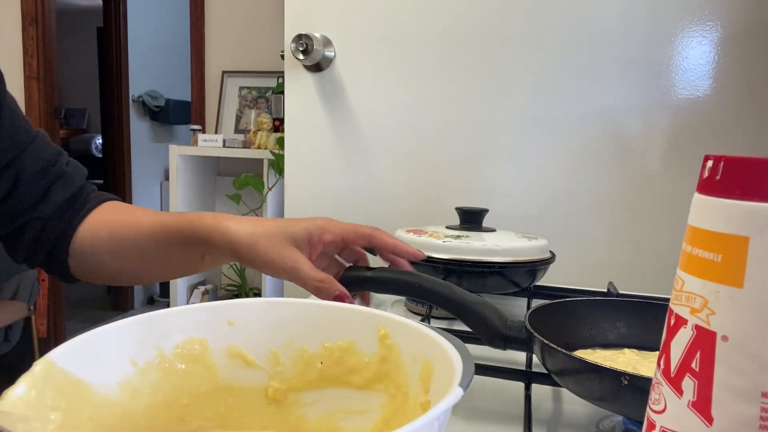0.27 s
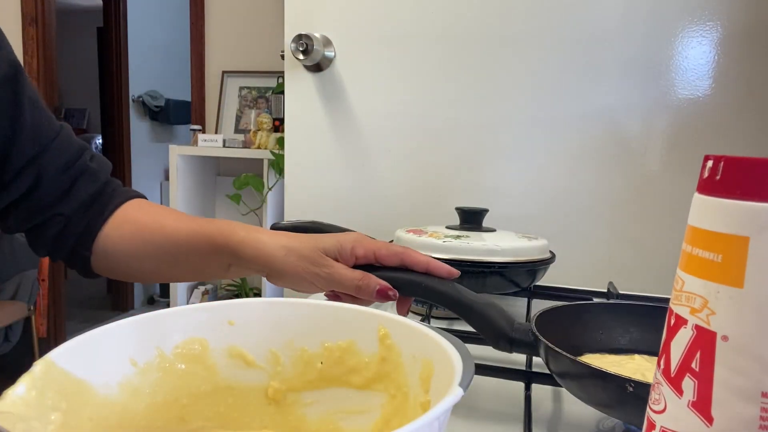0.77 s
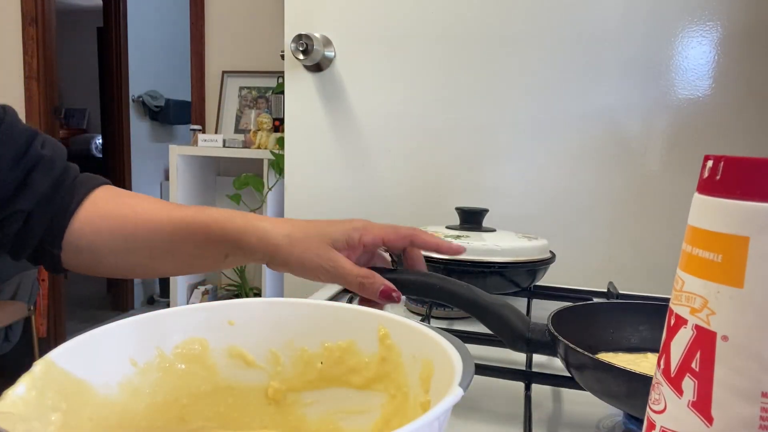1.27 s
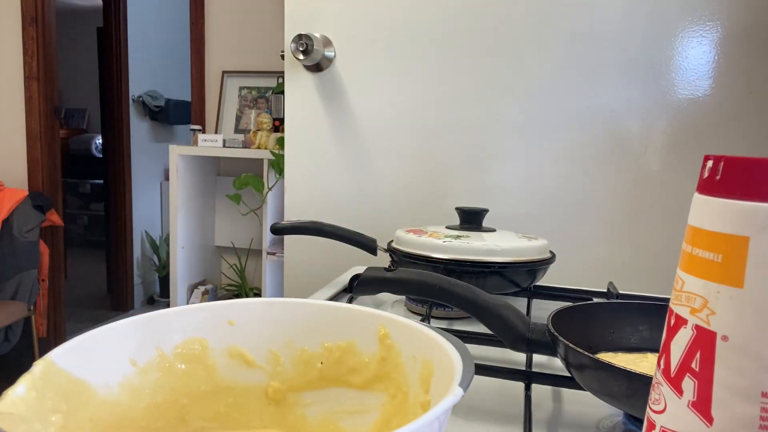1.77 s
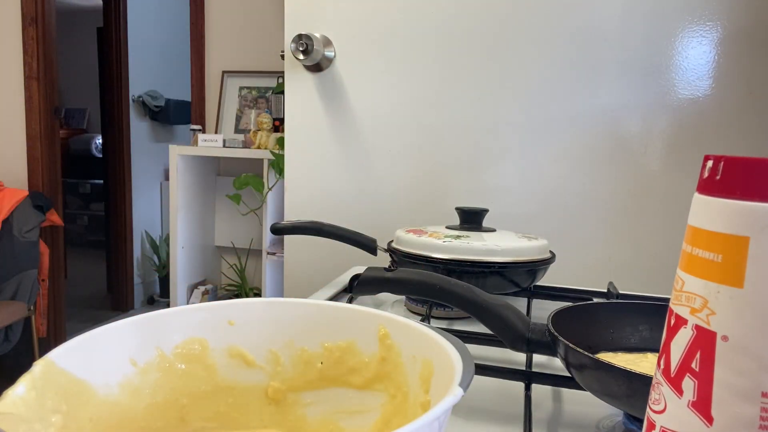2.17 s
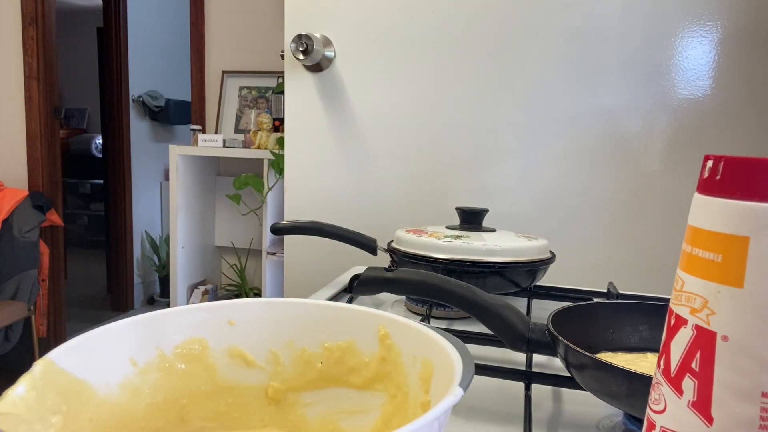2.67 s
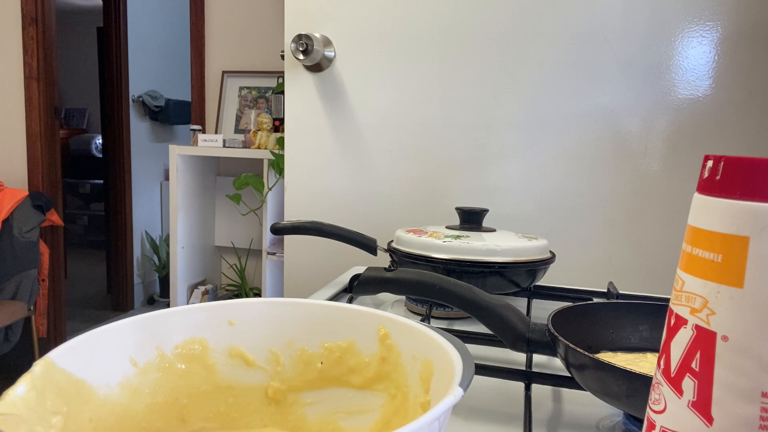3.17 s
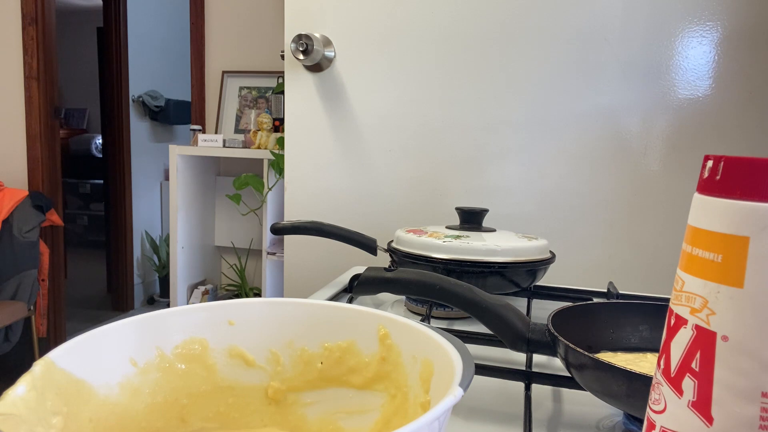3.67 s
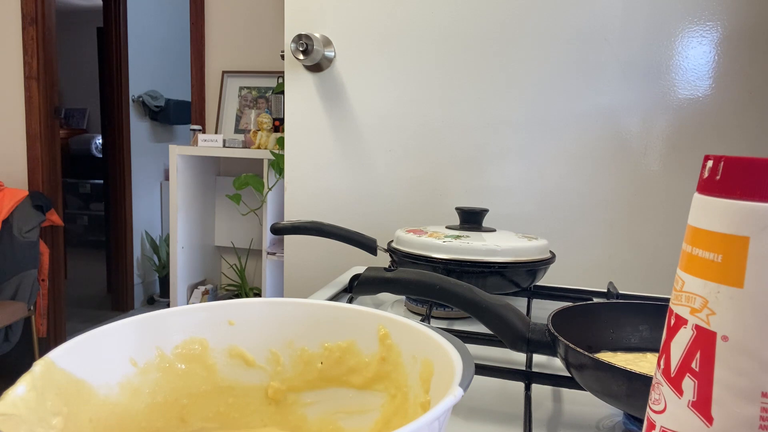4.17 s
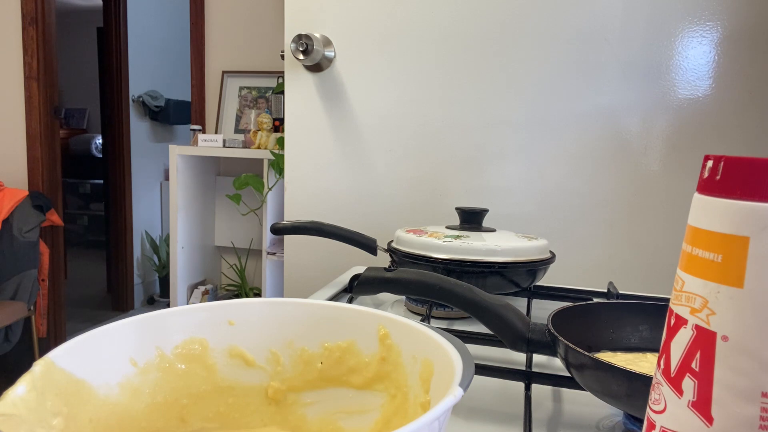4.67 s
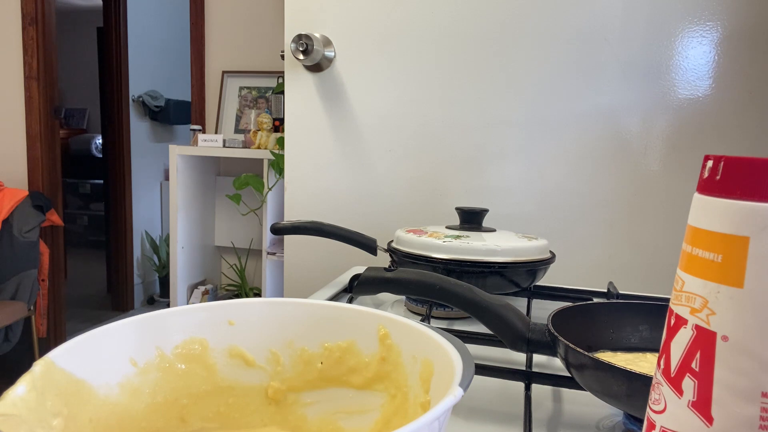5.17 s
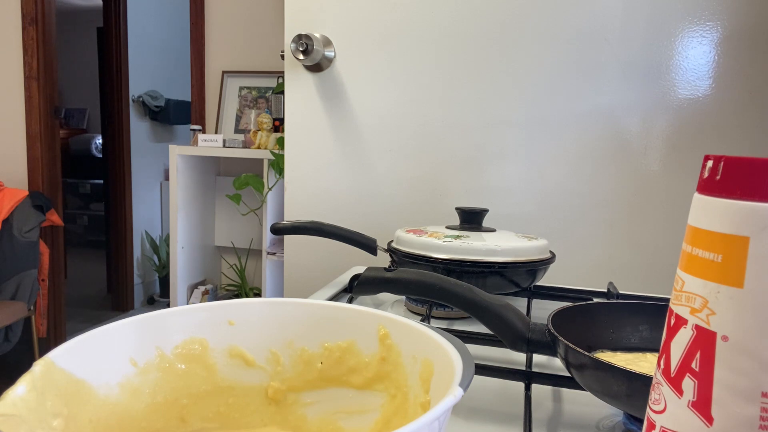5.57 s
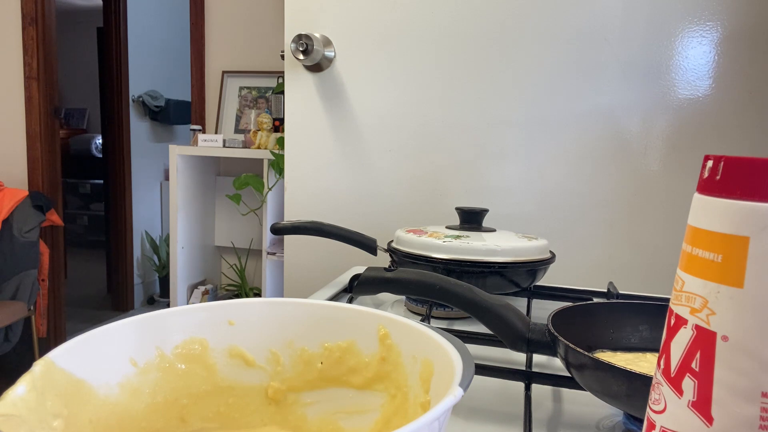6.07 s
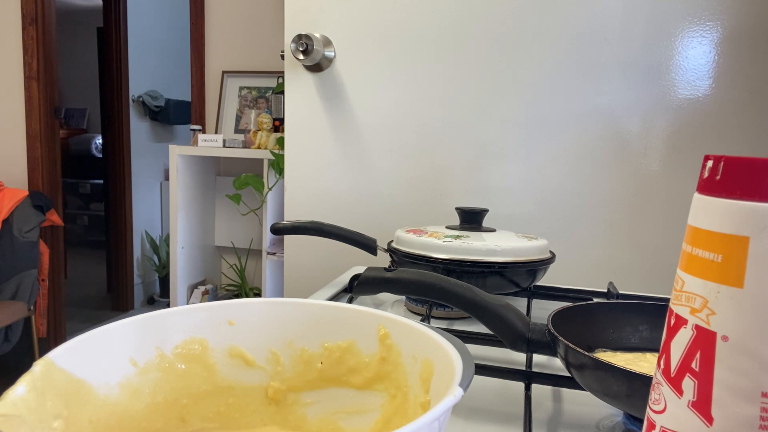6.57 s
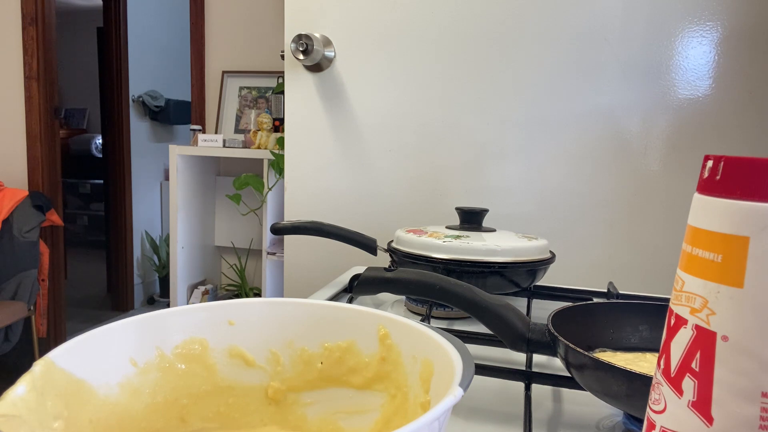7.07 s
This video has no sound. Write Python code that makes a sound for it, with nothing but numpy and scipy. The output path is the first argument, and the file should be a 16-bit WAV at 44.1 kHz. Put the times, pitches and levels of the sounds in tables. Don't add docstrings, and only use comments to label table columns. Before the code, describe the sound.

A small kitchen heard in stereo close to a frying pan, lasting about 7.3 seconds. A quiet, fine batter sizzle continues throughout, slightly brighter with time, over low rumble and fridge hum. A departing vehicle's hum sinks and fades by 0.6 s. A sharp fat spit snaps at 0.4 s, followed by dull cookware bumps and knocks from 0.6 to 1 s. Smaller spits pop at 1.5 and 2.1 s. Light bumps come at 3.2 and 3.5 s, a lid taps at 3.6 s, and a pot lands at 3.75 s with the loudest clunk, bouncing briefly with short dull rings. Thin metal clinks sound at 4.9 and around 6 s. Pops return at 5.3 and 5.6 s, a strong one at 6.44 s, then a soft bump and more near 7 s. Tiny bubble whistles flicker occasionally. An outside engine drones, working harder from 5 s.

```python
import sys
import numpy as np
from scipy import signal
from scipy.fft import rfft, irfft, next_fast_len
from scipy.io import wavfile
from scipy.ndimage import uniform_filter1d

SR = 44100
rng = np.random.default_rng(int(sys.argv[2]) if len(sys.argv) > 2 else 0)


def how_loud(loudness_db):
    steps = np.asarray(loudness_db, float) / 20
    return 10 ** steps


def generate_wav(sig):
    pcm = np.round(np.clip(np.atleast_2d(sig).T, -1, 1) * 32767).astype(np.int16)
    wavfile.write(sys.argv[1], SR, pcm)


N = 323246


def evened(x):
    return x / np.sqrt(np.mean(x ** 2) + 1e-20)


def read(points, hz):
    f, value = np.transpose(points)
    return np.interp(np.log(hz + 1), np.log(f + 1), value)


def curves(rows, t):
    s, *columns = np.transpose(rows)
    return [np.interp(t, s, c) for c in columns]


def add(mix, s, sound):
    part = mix[..., round(s * SR):][..., :sound.shape[-1]]
    part += sound[..., :part.shape[-1]]


def highpass(x, order, hz):
    return signal.sosfilt(signal.butter(order, hz, "high", fs=SR, output="sos"), x)


def wander(rate_hz, size):
    smooth = [1, -np.exp(-2 * np.pi * rate_hz / SR)]
    once = signal.lfilter([1], smooth, rng.standard_normal(size))
    return evened(signal.lfilter([1], smooth, once))


def tinted(x, shape_db):
    return irfft(rfft(x) * how_loud(shape_db(np.fft.rfftfreq(len(x), 1 / SR))), len(x))


def noise(field_db, size):
    frames, hz = 4 * N // size + 5, np.fft.rfftfreq(size, 1 / SR)
    a, b = rng.standard_normal((frames, len(hz), 2, 2)).T
    shape = how_loud(field_db(hz[:, None], np.arange(frames) * size / 4 / SR))
    return signal.istft((a + 1j * b) * shape, nperseg=size, noverlap=3 * size // 4)[1][:, :N]


def patches(hz, t, wide, long):
    blots = rng.standard_normal((len(t), len(hz))).T
    return evened(uniform_filter1d(uniform_filter1d(blots, wide, 0), long, 1))


def tone(turn_hz, db):
    t = np.arange(len(turn_hz)) / SR
    turn = 2 * np.pi * np.cumsum(turn_hz) / SR + 0.45 * wander(2.4, size=len(t))
    fade = np.minimum(1, np.minimum(t + 0.0073, t[-1] - t + 0.0053) / 0.014)
    return np.sqrt(2) * how_loud(db + 2.14 * wander(2.0, size=len(t))) * np.sin(turn) * fade


def ring(modes, pitch=1, contact=.001, count=8192):
    t = np.arange(count) / SR
    force = rng.standard_normal(count) * np.exp(-t / contact)
    force /= np.linalg.norm(force)
    share = np.maximum(uniform_filter1d(abs(rfft(force)), size=5), .4)
    sines = np.zeros(count)
    for hz, db, t60 in modes:
        mode_hz = hz * pitch
        sines += how_loud(db - 60 * t / t60) * np.sin(2 * np.pi * mode_hz * t) / share[int(mode_hz * count / SR)]
    return signal.fftconvolve(sines, force)[:count]


# (frequency [Hz], level [dB])
HISS_COLOUR = [(300, -9), (830, -14), (1100, -8.5), (1500, -13), (2000, -15.5), (2600, -12.5), (4000, -16),
               (5500, -17.5), (6800, -16), (8500, -18.5), (11000, -20), (14000, -23), (16000, -31),
               (16500, -40)]
# (time [s], level [dB])
FRYING = [
    (0.0, -58),
    (0.53, -58),
    (1.73, -58.5),
    (2.06, -57),
    (2.86, -58),
    (3.88, -56),
    (4.04, -57),
    (4.22, -58.5),
    (7.33, -57),
]
# (frequency [Hz], width [Hz], lift [dB])
PAN_RINGS = [(1004, 31, 3.5), (1500, 27.5, 5.5), (1798, 21, 5.5), (2212, 53, 4.5), (2463, 68, 5),
             (2930, 81, 2.5), (3330, 68, 3.5)]


def hiss():
    def field(hz, t):
        level_db = curves(FRYING, t)[0] - 22.72
        tilt_db = -0.55 + 0.11 * t
        rings = sum(db / (1 + ((hz - f) / width) ** 2) for f, width, db in PAN_RINGS)
        flicker = 0.94 * evened(uniform_filter1d(rng.standard_normal(len(t)), 6))
        blots = 2.47 * patches(hz, t, wide=5, long=16)
        tilted = tilt_db * np.log2((hz + 50) / 4000)
        return read(HISS_COLOUR, hz) + level_db + tilted + rings + blots + flicker
    steam = noise(field, size=512)
    ticks_per_s, tick_t60_s = 60, 0.0032
    ticks = how_loud(3.9 * np.minimum(rng.exponential(1, N), 3)) * (rng.random(N) < ticks_per_s / SR)
    crackle = signal.oaconvolve(ticks, how_loud(-60 * np.arange(400) / SR / tick_t60_s))[:N]
    return how_loud(20) * steam * (1 + 0.2 * crackle)


def load(t):
    from_s, full_s = 4.9, 6.9
    return np.clip((t - from_s) / (full_s - from_s), 0, 1)


# (frequency [Hz], level [dB])
RUMBLE_COLOUR = [(20, -26), (40, -56), (70, 4), (110, -1.5), (150, -8), (220, -13.5), (320, -13),
                 (480, -26.5), (900, -68)]


def rumble():
    t = np.arange(N) / SR
    low = noise(lambda hz, t: read(RUMBLE_COLOUR, hz) + 2.7 * patches(hz, t, wide=3, long=8), size=2048)
    return evened(low) * how_loud(-50.5 + 5 * load(t))


# (time [s], frequency [Hz], level [dB])
DEPARTING = [
    (0, 72, -36),
    (.18, 69.9, -37),
    (.3, 65.7, -47),
    (0.451, 61.6, -45),
    (.62, 57.3, -58),
]


def departing_vehicle():
    s = np.arange(DEPARTING[0][0], DEPARTING[-1][0], 1 / SR)
    out = np.zeros(N)
    add(out, s[0], tone(*curves(DEPARTING, s)))
    return out


# (start [s], end [s], start pitch [Hz], end pitch [Hz], level [dB])
DRONES = [
    (0, 0.56, 130, 133, -49.5),
    (0.7, 7.33, 93.4, 93.6, -49.5),
    (1.1, 4.9, 62, 80, -53),
    (4.5, 7.33, 76, 72, -48),
    (4.5, 6.15, 178.5, 175, -53.5),
    (6.3, 7.33, 173, 173.5, -53),
    (1, 2.7, 141, 141.2, -66),
    (1.6, 3.4, 140, 166, -65),
    (4.55, 5.35, 170, 130, -66),
    (6.55, 7.33, 190, 120, -56.5),
]


def drones():
    out = np.zeros(N)
    for start, end, from_hz, to_hz, db in DRONES:
        share = np.linspace(0, 1, round((end - start) * SR))
        swell_db = -4 * np.maximum(1 - share / 0.75, 0) * (start > .1)
        add(out, start, tone(from_hz + (to_hz - from_hz) * share, db + swell_db))
    return out


# (time [s], firing rate [Hz], level [dB])
ENGINE = [(0.66, 109.9, -47), (0.92, 112.4, -51), (1.13, 111.9, -51.5), (1.37, 111.5, -47),
          (2.94, 110.9, -48), (3.21, 108.5, -47), (3.73, 105.7, -40.5), (3.77, 106.1, -34),
          (4.0, 106.1, -42.5), (4.82, 102.3, -36.5), (5.86, 105.3, -41), (6.36, 108.5, -40.5),
          (7.22, 106.7, -42), (7.33, 110.7, -49)]
# (multiple of the firing rate, idle level [dB], gain under load [dB])
ENGINE_ORDERS = [(.42, -60.5, 0), (2, -72, 12.5), (3, -74.5, 10.5), (4, -79.5, 13)]


def engine():
    t = np.arange(ENGINE[0][0], ENGINE[-1][0], 1 / SR)
    firing_hz, level_db = curves(ENGINE, t)
    out = np.zeros(N)
    add(out, t[0], tone(firing_hz, level_db))
    for multiple, db, load_db in ENGINE_ORDERS:
        add(out, t[0], tone(multiple * firing_hz, db + load_db * load(t)))
    return out


# (time [s], level [dB], body frequency [Hz],
# contact [s])
BUMPS = [(.56, -43.5, 1020, 0.056), (.629, -36.5, 656, 0.012), (.645, -35.5, 400, 0.022),
         (3.773, -36, 154, 0.009), (3.866, -28, 150, 0.0074), (.63, -38, 980, 0.039),
         (0.659, -37, 4270, 0.0095), (.661, -33, 2000, 0.0066), (.697, -41, 2500, .004),
         (.708, -43, 2500, 0.015), (0.755, -43, 2600, 0.0071), (0.688, -47, 5000, .006),
         (.66, -39, 377, 0.03), (.67, -31, 119, 0.02), (.73, -32.5, 254, 0.008), (.76, -34, 197, 0.012),
         (0.73, -43, 3400, 0.0077), (0.734, -35.5, 1500, 0.011), (.778, -38.5, 620, 0.018),
         (.798, -40, 585, 0.011), (0.82, -39, 122, 0.052), (2.52, -46, 440, 0.035),
         (2.964, -45.5, 375, 0.057), (3.205, -36.5, 187.1, 0.014), (3.485, -36, 199, 0.03),
         (3.506, -37.5, 240, 0.011), (3.536, -31, 170, 0.015), (3.53, -48, 520, 0.025),
         (3.545, -44, 1300, .018), (3.565, -39, 251.3, 0.015), (3.585, -54, 1150, .01),
         (3.612, -43, 520, 0.0092), (4.907, -36, 4930, 0.008), (5.473, -40.5, 10900, 0.013),
         (.7, -57, 3500, 0.018), (1.125, -44.5, 8000, 0.038), (1.865, -45, 10200, 0.027),
         (0, -49, 10150, 0.023), (5.972, -43, 2130, 0.052), (4.398, -48, 3200, 0.093),
         (6.421, -42, 4800, 0.0057), (6.95, -47, 380, .04), (7.02, -51, 1300, 0.046), (7.1, -49, 330, 0.11),
         (6.885, -40, 446.5, 0.024), (6.888, -35, 766, 0.017)]


def bumps():
    out, t = np.zeros(N), np.arange(8192) / SR
    soft_ends = np.clip(np.minimum(t / .0006, (t[-1] - .03 - t) / .05), 0, 1)
    for s, db, body_hz, contact in BUMPS:
        def body(hz):
            peak = 15.3 / (1 + ((hz - body_hz) / (0.78 * body_hz)) ** 2)
            return peak - 6 * abs(np.log2((hz + 20) / body_hz))
        rise = np.minimum(t / (0.072 * contact), 1)
        push = rng.standard_normal(8192) * rise * np.exp(-t / contact)
        push = tinted(push, body) * soft_ends
        add(out, s, how_loud(db) * push / abs(push).max())
    return out


# (time [s], peak level [dB], dullness [dB per octave])
SPITS = [(0.155, -30, 0), (0.244, -35.5, 4), (0.3969, -13, 2.5), (0.909, -37.5, -11), (1.1201, -35, -3),
         (1.4802, -25, 1), (1.859, -35, -15), (1.931, -35, 1), (2.096, -30, 0), (2.1428, -20, 4),
         (3.3693, -40, 1), (3.7373, -33, 3.8), (3.9419, -34, 3), (3.974, -38, -6), (4.006, -36, -8),
         (4.0317, -38, 3.8), (4.2537, -31.5, -1), (4.524, -35, 4), (5.293, -32.5, 4), (5.3082, -23, 2),
         (5.5601, -22.5, -0.5), (5.802, -36, 2), (6.105, -37, 0), (6.281, -33, -4), (6.4423, -15.5, 2.5),
         (6.5497, -30.5, 3), (6.915, -21.5, 1), (7.1172, -21, -1.5), (7.2616, -29, 9), (7.047, -37, 3.5)]
# (frequency [Hz], level [dB])
SPIT_COLOUR = [(250, -16), (600, -36), (1200, -6), (2600, -11.5), (4200, 4), (5800, 8.5), (7600, 12),
               (9300, 3.5), (11000, 5.5), (13000, 7), (15500, 4), (16450, -13), (16600, -60)]


def spits():
    out, bare, t = np.zeros(N), np.zeros(N), np.arange(4096) / SR - .002
    late = np.maximum(t - .001, 0)
    thud = np.sin(2 * np.pi * 1050 * late) * how_loud(-60 * late / 0.0048)
    for s, db, dull in SPITS:
        def colour(hz):
            return read(SPIT_COLOUR, hz) - np.clip(dull, -4, 4) * np.log2(np.maximum(hz, 3000) / 7000)
        splutter, fizz = rng.standard_normal((2, 4096)) * (t > 0)
        snap = tinted(1. * (np.arange(4096) == 90), colour)
        burst = .12 * splutter * how_loud(-60 * t / .005)
        burst += how_loud(-19.5 - 60 * t / 0.014) * fizz
        burst[[90, 96, 131, 448, 470]] += [-1., .3, .3, .12, -.1]
        burst = tinted(burst, colour)
        add(out, s - .001, how_loud(db) * (burst / abs(burst).max() + how_loud(-14.5) * thud))
        add(bare, s - .001, how_loud(db) * snap / abs(snap).max())
    return out, bare


# (time [s], level [dB], frequency [Hz], length [s])
BUBBLES = [
    (0.411, -45, 3000, 0.014),
    (0.43, -45, 3116, 0.013),
    (0.995, -54, 1408, 0.063),
    (4.005, -51.5, 1124, 0.061),
    (5.357, -50, 1710, 0.04),
    (6.11, -57, 1080, 0.082),
    (6.414, -51, 1725, 0.041),
    (6.464, -53, 1070, 0.073),
    (7.046, -57.5, 1499, 0.049),
]


def bubbles():
    out = np.zeros(N)
    for s, db, hz, length in BUBBLES:
        t = np.arange(0, length, 1 / SR)
        pitch_hz = hz * (1 + 0.04 * wander(115.0, size=len(t)))
        turn = 2 * np.pi * np.cumsum(pitch_hz) / SR
        level = how_loud(db - 3.5 + 2.6 * wander(60.0, size=len(t)))
        add(out, s, level * np.sin(turn) * signal.windows.tukey(len(t), .4))
    return out


# (time [s], level [dB], frequency [Hz], time to fall 60 dB [s])
KNOCKS = [(.629, -36.5, 650, 0.13), (0.66, -39, 960, 0.086), (0.72, -41, 830, 0.11), (.73, -41, 390, 0.13),
          (0.62, -38, 150, 0.23), (0.65, -42.5, 398, 0.37), (0.65, -31, 84, 0.21), (0.63, -42, 242, 0.33),
          (.7, -36, 94, 0.57), (.735, -40, 50, .3), (.745, -43, 449, .15), (.755, -41.5, 250, 0.22),
          (0.85, -43, 590, .08), (.797, -39, 595, 0.087), (.79, -39, 144, 0.31), (0.97, -36.5, 66.6, 0.27),
          (3.207, -39.5, 215, 0.092), (3.207, -45, 320, 0.066), (3.5, -36.5, 230, .15),
          (3.535, -33.5, 158, .15), (3.53, -41, 528, 0.14), (3.545, -50, 940, .12),
          (3.748, -13.5, 376, 0.045), (3.753, -24, 2078, 0.11), (3.849, -44.5, 1900, 0.17),
          (3.745, -28, 1319, .04), (3.757, -22, 902, 0.066), (3.762, -20, 241.7, 0.14),
          (3.774, -21.5, 152, 0.068), (3.77, -27.5, 75, .25), (3.865, -38, 105, 0.096),
          (3.821, -35, 2120, 0.18), (3.61, -36, 480, .1), (3.629, -32, 540, 0.11), (3.62, -38, 950, .1),
          (3.776, -28, 690, 0.062), (3.803, -21, 390, 0.093)]


def knocks():
    out, t = np.zeros(N), np.arange(SR // 2) / SR
    rise = 1 - np.exp(-t / 0.0027)
    for s, db, hz, t60 in KNOCKS:
        add(out, s, how_loud(db - 60 * t / t60) * rise * np.sin(2 * np.pi * hz * t))
    return out


# (frequency [Hz], level [dB], time to fall 60 dB [s])
LID = [(216, -18, 0.068), (405.4, -6, 0.04), (520, -0.5, 0.047), (551, 1.5, 0.03), (880, -5, 0.072),
       (913, -4, 0.065), (1324, -12, .05), (1600, -26, .05), (2600, -15, 0.04)]
# (time [s], level [dB], contact [s])
LID_TAPS = [
    (3.61, -39, 0.008),
    (3.622, -34.5, 0.0056),
    (3.646, -37.5, .005),
    (3.628, -32, 0.008),
    (3.68, -46, 0.0053),
]


def rattling_lid():
    out = np.zeros(N)
    for s, db, contact in LID_TAPS:
        add(out, s, how_loud(db) * ring(LID, 1.0, contact))
    return out


# (frequency [Hz], level [dB], time to fall 60 dB [s])
POT = [(153, -14.5, 0.092), (239, -10, 0.044), (360, -16, 0.06), (405, -14, 0.085), (474, -26, 0.047),
       (634, -31, 0.07), (706, -30, 0.07), (775, -29, 0.059), (890, -15, 0.07), (962, -22, 0.072),
       (1297, -19, 0.045), (2064, -22, 0.17), (2030, -33, 0.3), (3200, -30.5, 0.09)]
# (frequency [Hz], level [dB])
CLATTER = [(35, -45), (90, -24), (150, -8), (200, -15), (350, 2), (500, -4.5), (800, 1), (1100, -4.5),
           (1500, -14), (2100, -9.5), (2800, -20.5), (3700, -23.5), (5300, -28), (6400, -27.5), (9000, -41),
           (14000, -56)]
# (time [s], level [dB], contact [s], dullness [dB per octave])
POT_BLOWS = [(3.735, -29, 0.0039, 4), (3.7432, -20, 0.0051, -2), (3.7486, -11.5, 0.003, -0.5),
             (3.7543, -5.5, 0.004, 0), (3.765, -19, 0.0023, -3.5), (3.776, -19, 0.0028, 7),
             (3.7815, -20, 0.0024, -3), (3.79, -29.5, 0.004, -7.5), (3.838, -32, 0.006, -1),
             (3.803, -20, 0.0038, -3), (3.82, -35, 0.0089, 3), (3.869, -34.5, 0.01, 3)]


def pot_set_down():
    pot, t = np.zeros(N), np.arange(8192) / SR
    for s, db, contact, dull in POT_BLOWS:
        blow = tinted(rng.standard_normal(8192), lambda hz: read(CLATTER, hz) - dull * np.log2((hz + 50) / 500))
        blow *= np.minimum(t / 0.00086, 1) * np.exp(-t / contact)
        add(pot, s, how_loud(db) * blow / abs(blow).max())
        add(pot, s, how_loud(db) * ring(POT, 1, contact))
    return highpass(pot, 4, 135)


# (frequency [Hz], level [dB], time to fall 60 dB [s])
CUTLERY = [(1649, -12, 0.084), (3032, -6, 0.053), (4726, 0.5, 0.013), (7180, -8.5, 0.022),
           (7590, -11, 0.053), (10300, -9, .015), (11800, -12, 0.013), (13200, -10, 0.021)]
# (time [s], level [dB], pitch factor)
CLINKS = [
    (4.909, -35.5, 1.005),
    (4.926, -40, 1.01),
    (5.973, -50, 0.93),
    (6.144, -44.5, 1.1),
]


def cutlery():
    out = np.zeros(N)
    for s, db, pitch in CLINKS:
        add(out, s, how_loud(db) * ring(CUTLERY, pitch, 0.007))
    return out


def cookware():
    return highpass(bumps() + rattling_lid() + cutlery() + pot_set_down(), 2, 60)


# (frequency [Hz], time to fall 60 dB [s])
KITCHEN = [(100, 0.44), (400, 0.29), (1000, 0.32), (3000, 0.29), (8000, 0.3), (15000, 0.28)]


def kitchen(x):
    taps = np.zeros((2, SR))
    at = np.arange(200, SR - 20, 20) + rng.integers(0, 20, (2, (SR - 201) // 20))
    np.put_along_axis(taps, at, rng.choice([-1., 1.], at.shape), 1)
    hz, t, z = signal.stft(taps, SR, nperseg=256)
    tail = signal.istft(z * how_loud(-60 * t / read(KITCHEN, hz)[:, None]), SR, nperseg=256)[1]
    return signal.fftconvolve(x[None], tail / np.linalg.norm(tail[0]), axes=1)[:, :N]


def standing_waves(pair, depth_db=5.0, count=150):
    size = next_fast_len(N)
    hz = np.fft.rfftfreq(size, 1 / SR)
    ripple = evened(uniform_filter1d(rng.standard_normal((2, len(hz))), count))
    ripple_db = depth_db * ripple * hz / (hz + 300) / (1 + hz / 4000)
    return irfft(rfft(pair, size) * how_loud(ripple_db), size)[:, :N]


# (frequency [Hz], likeness 0 to 1)
ALIKE = [(60, .98), (160, .93), (270, .6), (450, .15), (5800, .1), (7000, .6), (8000, .75), (8500, .92),
         (9600, .9), (11000, .82), (13300, .75), (14000, .9)]
# (frequency [Hz], phase [radians])
LEAD = [(150, -.1), (400, -.5), (800, -1.6), (2200, -1.6), (3400, -.5), (4200, .9), (4800, -.5),
        (5300, -2.2), (6200, -.2), (7000, -.5), (8800, 0), (10000, .6), (12000, 1.5), (13500, 2.3),
        (14200, 2.8), (15500, 3.1)]
# (frequency [Hz], level [dB])
BALANCE = [(100, -0.37), (300, -1), (700, -1.5), (2000, 1.5), (5000, 0.5), (8000, 0)]


def ports(pair):
    size = next_fast_len(N)
    a, b = rfft(pair, size)
    hz = np.fft.rfftfreq(size, 1 / SR)
    same = np.clip(read(ALIKE, hz), 0, 1)
    side = how_loud(read(BALANCE, hz) / 2)
    right = (same * a + np.sqrt(1 - same ** 2) * b) * np.exp(-1j * read(LEAD, hz))
    return irfft([a * side, right / side], size)[:, :N]


def scene():
    steady = standing_waves(hiss() + rumble())
    motors = departing_vehicle() + drones() + engine()
    (fat, snaps), far, sung = spits(), cookware() + knocks(), bubbles()
    wet = kitchen(how_loud(-2.5) * snaps + how_loud(-3.0) * far + how_loud(-1.0) * sung)
    return ports(wet + fat + how_loud(-1.5) * far + sung + motors + steady)


def joint_stereo(x, weaker_db=9.0, snap_db=6.5):
    lead_in, window = 205, np.sin(np.pi * (np.arange(2048) + .5) / 2048)
    pair = np.pad([x[0] + x[1], x[0] - x[1]], ((0, 0), (lead_in, 0))) / 2
    z = signal.stft(pair, SR, window, nperseg=2048, noverlap=1024)[2]
    bands, band = z[:, :1024].reshape(2, 32, 32, -1), np.arange(32)[:, None]
    power_db = 10 * np.log10((abs(bands) ** 2).sum(2) + 1e-20)
    weak = (power_db < power_db[::-1] - weaker_db) & (band >= 10)
    weak = weak | (band >= np.array([20, 23])[:, None, None])
    z[:, :1024] = (bands * ~weak[:, :, None]).reshape(2, 1024, -1)
    thinned = signal.istft(z, SR, window, nperseg=2048, noverlap=1024)[1][:, lead_in:lead_in + N]
    treble = highpass(x, 4, 9000)
    level = np.sqrt(abs(uniform_filter1d((treble ** 2).sum(0), size=128)))
    jumps = 1. * (level > how_loud(snap_db) * uniform_filter1d(level, size=2048))
    widened = 1. * (uniform_filter1d(jumps, size=128) > 0)
    snap = uniform_filter1d(widened, size=128)
    mid, side = snap * pair[:, lead_in:] + (1 - snap) * thinned
    return np.array([mid + side, mid - side])


def roll_off(x):
    return signal.sosfilt(signal.butter(12, 16490, fs=SR, output="sos"), x)


def record(dry):
    ceiling = .6
    limited = ceiling * np.tanh(dry / ceiling)
    return roll_off(joint_stereo(limited))


dry = scene()
out = record(dry)
generate_wav(out)
```